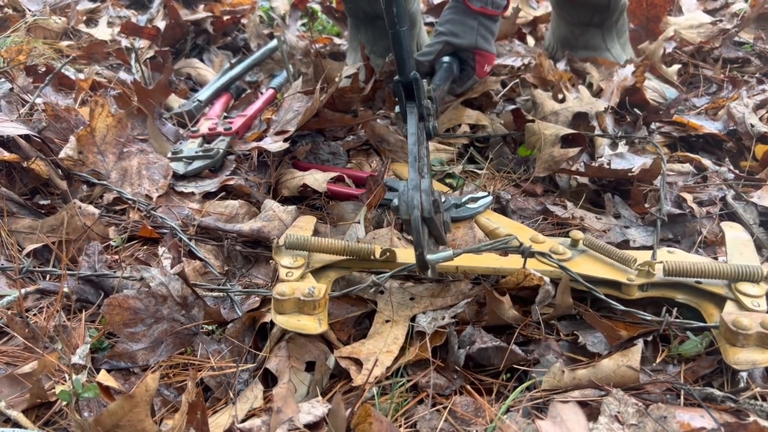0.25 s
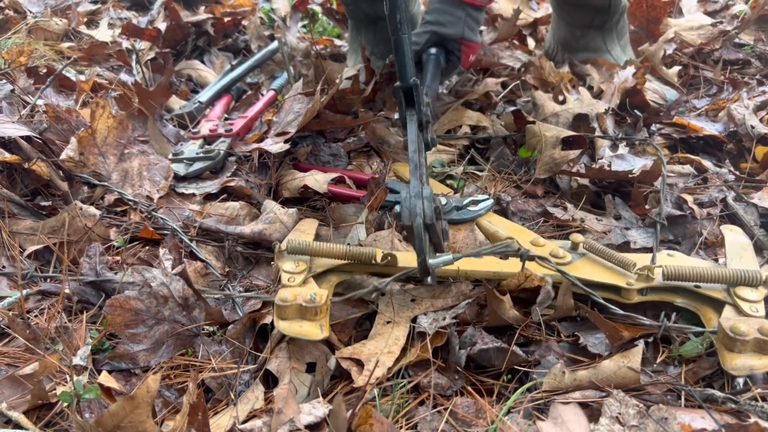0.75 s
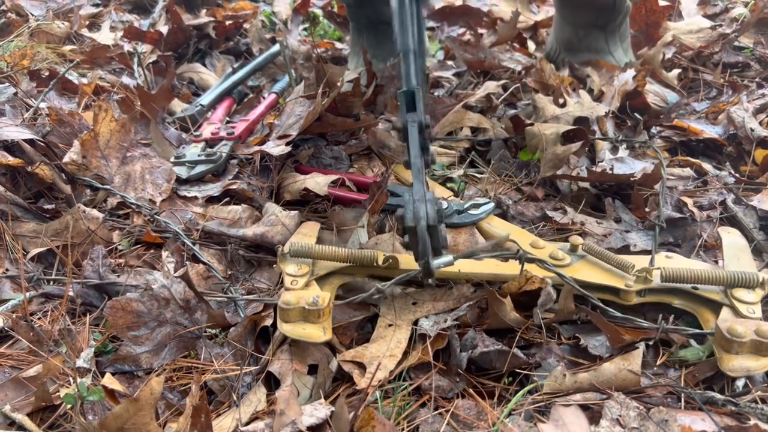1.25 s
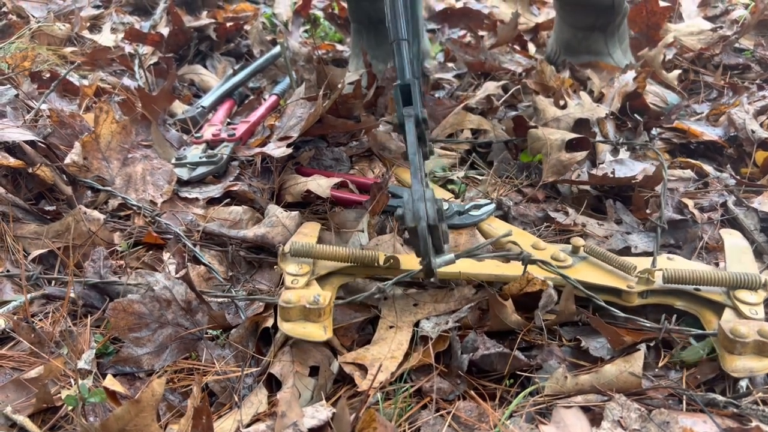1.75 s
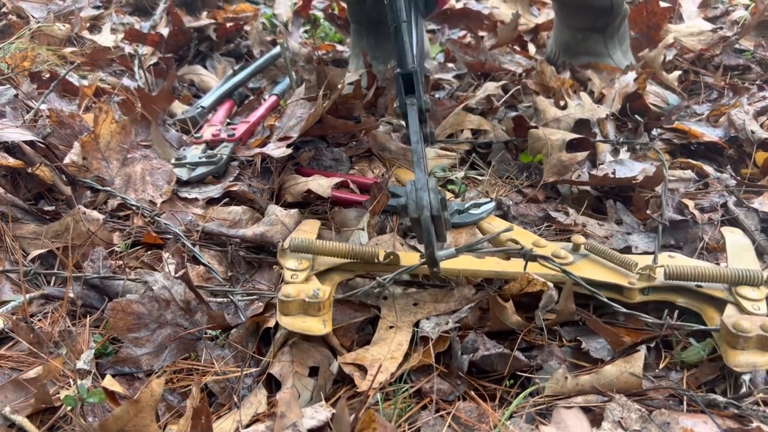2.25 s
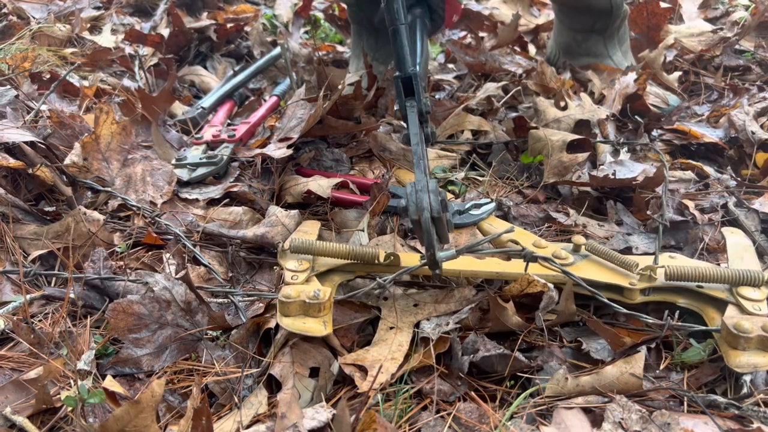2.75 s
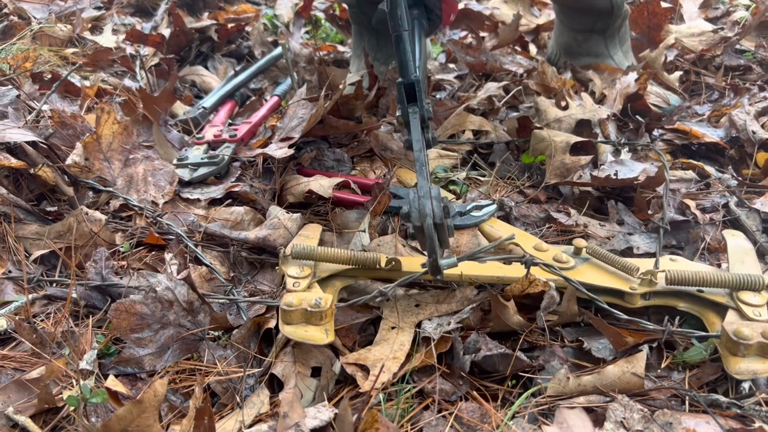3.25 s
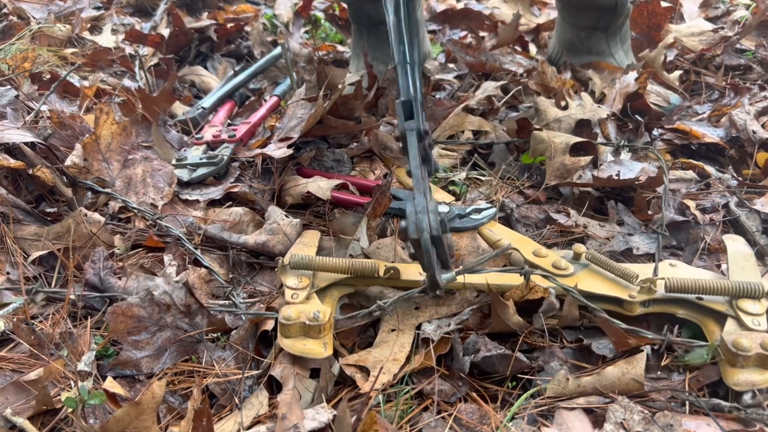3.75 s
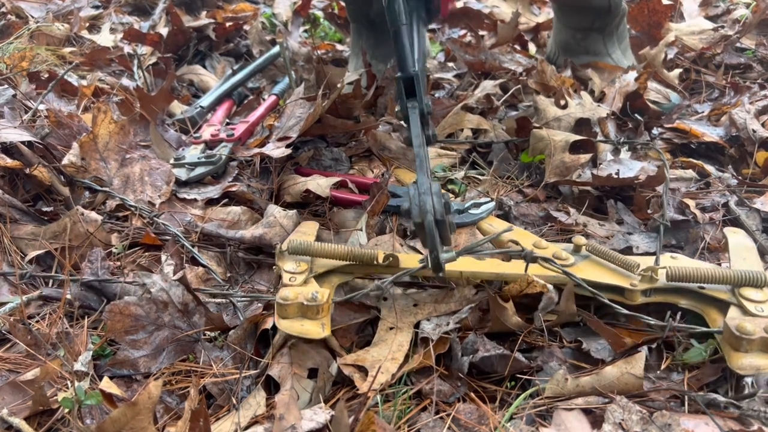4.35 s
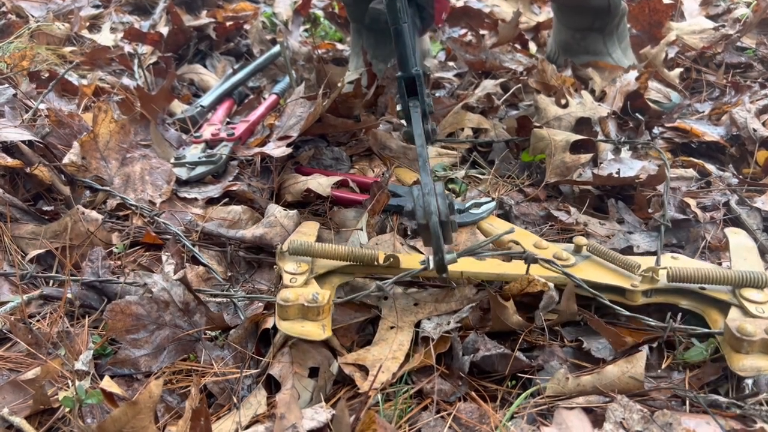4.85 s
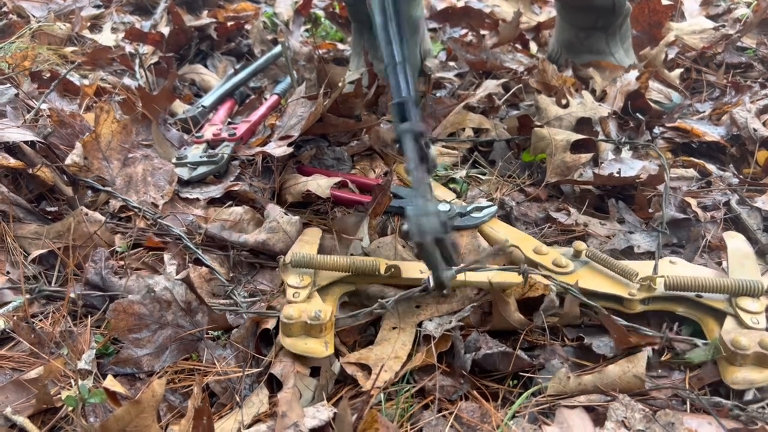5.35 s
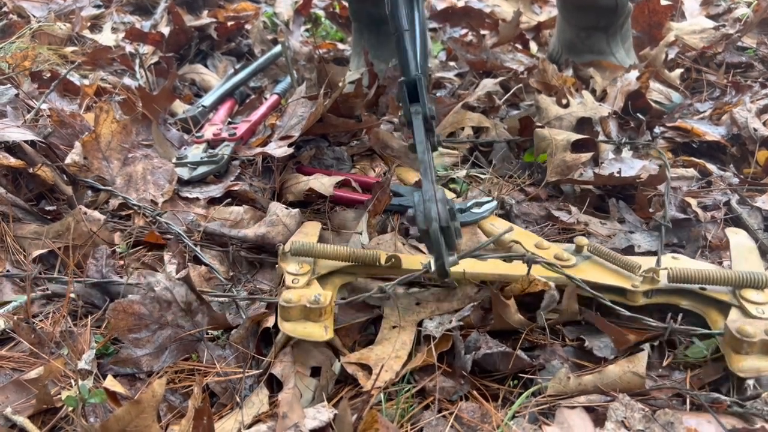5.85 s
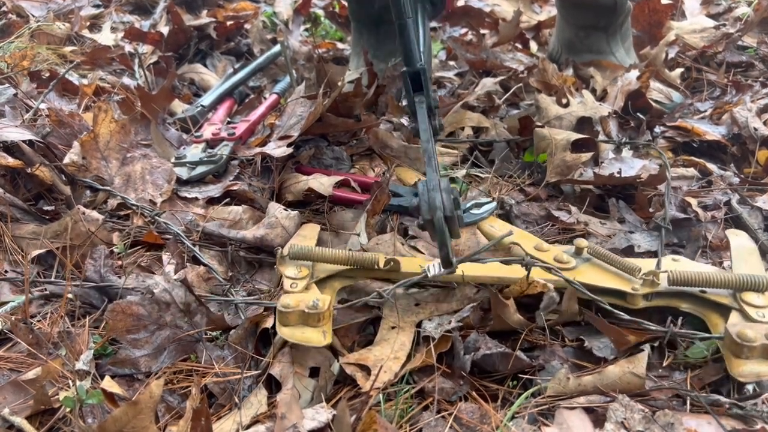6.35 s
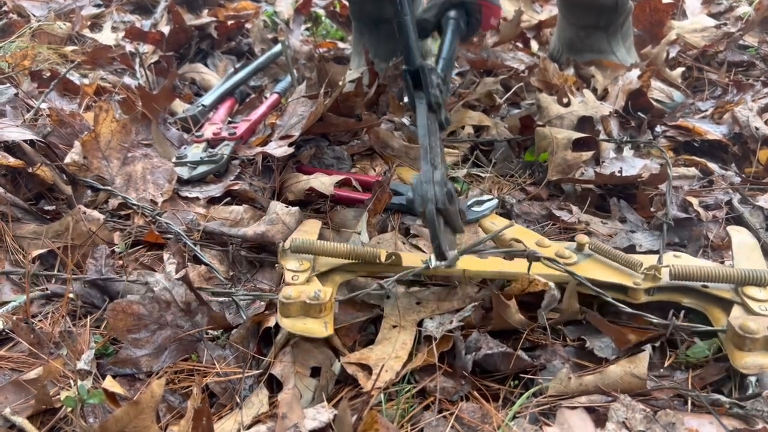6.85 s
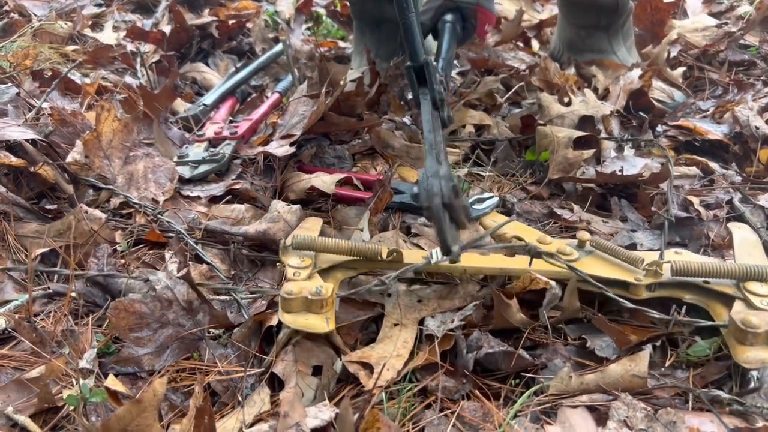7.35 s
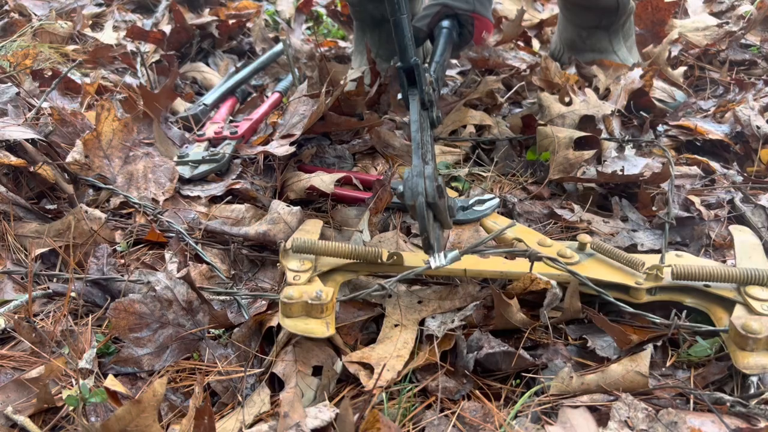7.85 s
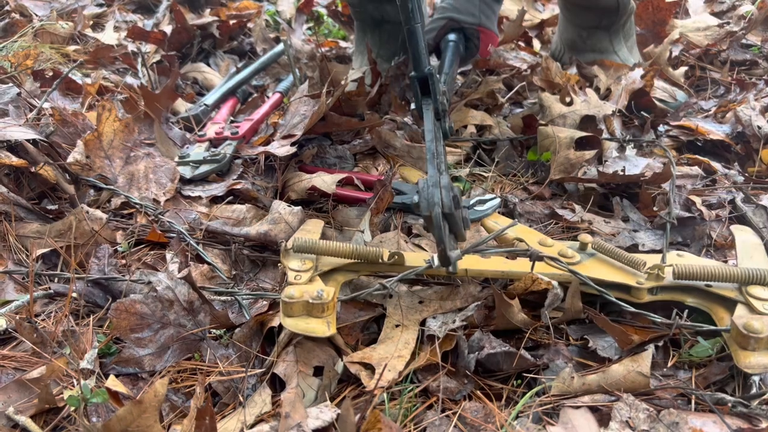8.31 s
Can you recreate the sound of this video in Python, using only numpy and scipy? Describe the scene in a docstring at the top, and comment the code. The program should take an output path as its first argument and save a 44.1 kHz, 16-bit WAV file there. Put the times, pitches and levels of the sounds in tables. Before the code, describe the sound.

Outdoors on leafy ground, a long-handled crimper works on wire. Three hard, very short steel clacks stand far above everything else, roughly two seconds apart. Between them come small metal ticks, brief scrapes, soft jacket and glove rustle and crackling leaves. After the last clack the jaws loosen with a busier run of ringing ticks and rattles. Close microphone, dry, with low wind rumble.

```python
"""Three loud steel clacks ring out as a long-handled crimping tool squeezes a sleeve on fence wire over dry leaves.
The clacks are sums of damped handle modes with a short noise crack. Between them the jaws tick, scrape and chatter:
gritty noise pushes one bank of steel resonances. Gloves and jacket rustle as coloured noise under a movement
curve, leaves crackle as short noise bursts round a pitch, and a light wind rumbles on the microphone as low noise."""
import sys
import numpy as np
from scipy import signal
from scipy.fft import rfft, irfft, next_fast_len
from scipy.io import wavfile
from scipy.ndimage import map_coordinates

SR = 44100
rng = np.random.default_rng(int(sys.argv[2]) if len(sys.argv) > 2 else 0)


def file_out(sig):
    """Save sig as 16-bit WAV at sys.argv[1]."""
    # one column per channel
    cols = np.atleast_2d(sig).T
    # limit, then scale
    lim = np.clip(cols, -1, 1)
    pcm = np.round(lim * 32767).astype(np.int16)
    wavfile.write(sys.argv[1], SR, pcm)


def amplitude_ratio(level_db):
    """Convert a level in decibels to the matching linear amplitude (field) ratio."""
    exponent = np.asarray(level_db, float) / 20
    return 10 ** exponent


N = 378378
TIME = np.arange(N) / SR

# the handles meet their stops: (time [s], level [dB])
CLACKS = [(1.2602, -4), (3.6229, -5.5), (5.3102, -4)]
# modes of the closed handles, before the grip damps them: (frequency [Hz], level [dB], t60 [s])
HANDLE_MODES = [(110, -30, .04), (978, -9.5, .042), (1400, -12, .008), (2335, -2, .036), (2700, -26, .008),
                (3000, -13, .012), (3500, -17, .01), (3800, -18, .014), (4130, -18, .016),
                (4750, -19, .018), (5300, -26, .015), (6500, -26, .015), (7300, -28, .015),
                (8300, -27, .018), (8850, -28, .018)]
GRIP_S = .0045  # gripping hands damp the handles: 1 dB lost by then, growing with the square of time

# jaws touch wire or sleeve: (time [s], level [dB], relative treble [dB], favoured pitch [Hz], slide t60 [s])
CONTACTS = [(0.6384, -43, -11, 2780, 0.12), (1.2131, -28.5, -14.5, 5000, 0.099),
            (1.3167, -33, -29, 3700, 0.049), (1.8506, -44, -11.5, 1230, 0.065),
            (1.8821, -36, -8, 4770, 0.013), (1.9872, -49, -1.5, 3600, 0.06),
            (2.0874, -42, -30, 4630, 0.085), (2.149, -44, -9, 4800, 0.24), (2.9214, -42.5, -30, 4700, 0.18),
            (2.953, -38.5, -20, 4790, 0.16), (3.6846, -34, -25.5, 3650, 0.05),
            (4.0634, -40.5, -3, 1610, 0.033), (4.1132, -23, -3, 5200, 0.035),
            (4.289, -39.5, -13, 5100, 0.24), (5.7945, -39, -9.5, 4800, 0.11), (6.07, -46, -1.5, 4730, 0.18),
            (6.1755, -49, -19.5, 4800, 0.088), (6.728, -32, -5.5, 4040, 0.08),
            (6.8583, -38.5, 1.5, 1560, 0.14), (7.2893, -37.5, -1, 3600, 0.11), (7.3675, -35, -7, 3730, 0.2),
            (7.396, -34, -9, 4270, 0.24), (7.4992, -30, -11, 3320, 0.026), (7.548, -49, -3, 4900, .06),
            (7.6708, -42.5, -14, 4180, 0.066), (7.7147, -41.5, -8.5, 4100, 0.15),
            (7.7987, -47, -12, 4150, .05), (7.9034, -45.5, 4, 4830, 0.027), (7.9478, -45.5, -7, 4790, 0.26),
            (8.091, -41, -7.5, 4060, 0.12), (8.3203, -40.5, -9, 3540, 0.07)]
OVERTONE = 2.27  # a touch also favours the treble this many times above its pitch
# the dull knock under a touch, relative to it at a pitch of 4800 Hz; deeper touches knock harder
KNOCK_DB, KNOCK_DB_PER_OCTAVE = -10.5, -8
# a loose part chatters: (start [s], gap [s], level [dB], loss per tick [dB], negative where the ticks grow)
CHATTER = [(6.79, .03, -50.5, -3), (7.31, .028, -46, 1), (7.686, .028, -54.5, -1),
           (7.851, 0.026, -55.5, -1), (7.926, .021, -49, 1), (7.988, .021, -48, 2.5)]
CHATTER_TICKS = 3  # in each run
CHATTER_TREBLE_DB, CHATTER_HZ, CHATTER_SLIDE_S = -1, 4900, 0.047
CHATTER_PING_HZ, CHATTER_PING_DB, CHATTER_PING_T60_S = 11400, -2, 0.041  # the loose part's own note
# steel drags over steel: (start [s], length [s], level [dB], relative treble [dB], swell from start to end [dB])
DRAGS = [(1.859, 0.022, -50.5, -3, -5), (1.922, 0.066, -64, -18, 4), (2.089, 0.029, -48, -9.5, -5),
         (2.149, 0.09, -56, -7.5, 11), (2.923, 0.068, -48, -6.5, 0.5), (4.06, 0.027, -48.5, -1, -4),
         (4.107, 0.011, -44, -1, -3), (4.285, 0.039, -41.5, 0, -7.5), (5.943, 0.012, -56, -10, -2),
         (6.074, 0.059, -40.5, -3, -11), (6.162, 0.023, -52.5, -8.5, 6.5), (6.728, 0.032, -51, -0.5, 7),
         (6.755, 0.088, -50, 1, -13), (6.854, .03, -49, -7, -4), (7.284, 0.087, -43.5, -5, -7),
         (7.369, 0.11, -41, 3, -13), (7.487, 0.058, -43.5, -16, -8), (7.66, 0.067, -59.5, -9, 8.5),
         (7.788, 0.0069, -50.5, -12, -3.5), (7.845, 0.024, -52, -3, 3.5), (7.902, 0.11, -50.5, -2, -4.5)]
BITE_S, LIFT_DB_PER_S = 0.01, 388  # how fast a drag catches and lets go
# broad resonances of jaws and wire: (frequency [Hz], width [Hz], relative level [dB])
STEEL_MODES = [(1576, 190, -12.5), (2183, 210, -6.5), (2720, 51, -7), (3030, 83, -7), (3290, 140, -10.5),
               (3820, 180, -9), (4150, 42, -7), (4800, 86, -3), (5110, 62, -16.5), (5480, 190, -14.5),
               (5670, 73, -27), (6000, 55, -19.5), (6400, 56, -12), (6900, 270, -7.5), (8300, 75, -16),
               (7900, 100, -10), (9600, 270, -17.5), (8520, 83, -13), (10186, 140, -8.5), (10600, 59, -20),
               (11330, 130, -8), (12200, 130, -13.5), (13700, 330, -22.5), (14400, 42, -28.5),
               (14220, 82, -20.5), (15400, 74, -33)]
# thin modes of taut wire and handles that outlast a touch:
# (frequency [Hz], relative level [dB], t60 [s], limited to 0.6 s)
WIRE_MODES = [(1510, -11, 0.69), (2360, -12.5, .3), (2670, -13, 0.63), (3020, -6.5, 0.4), (3420, -12.5, .4),
              (3620, -8.5, 0.56), (3730, -10.5, .45), (4050, -11, 0.38), (4900, -12, .55),
              (4770, -7.5, 0.19)]
LOOSE_FROM_S, LOOSE_RING_DB = 7.6, 4  # once the jaws hang loose the thin modes sing on louder

# arms and feet shift: (peak time [s], rise [s], fall [s], rustle level [dB]); rise and fall each span 13.93 dB
MOVES = [(.45, 0.024, 0.41, -71), (.63, 0.073, 0.14, -63), (0.731, .07, 0.092, -52.5),
         (.95, 0.098, 0.079, -63), (1.109, 0.052, 0.1, -55), (1.33, 0.3, 0.15, -60),
         (1.45, 0.11, 0.18, -57.5), (1.57, .04, 0.42, -64), (3.1, 0.18, 0.39, -69),
         (3.329, 0.087, 0.09, -58), (3.439, 0.045, 0.29, -57.5), (3.62, 0.064, 0.24, -57.5),
         (3.82, 0.053, 0.74, -65.5), (4.201, 0.56, .08, -66), (4.45, 0.11, 0.21, -72),
         (4.67, .12, 0.021, -71), (4.752, 0.029, 0.015, -66), (5.066, 0.11, 0.033, -53),
         (5.22, 0.2, 0.04, -53.5), (5.38, 0.11, 0.24, -50.5), (5.6, 0.17, 0.1, -60.5),
         (5.871, 0.29, .2, -67.5), (5.979, 0.063, 0.021, -63), (6.25, 0.39, 0.22, -60.5),
         (6.52, 0.19, .08, -59.5), (6.599, 0.12, 0.036, -61), (6.72, 0.13, 0.42, -61.5),
         (7.27, 0.12, 1, -63.5), (7.64, .03, 0.18, -73.5), (8.15, .3, .15, -78)]
REST_DB = -76  # cloth is never quite still
# leaves snap: (time [s], level [dB], relative treble [dB], pitch [Hz])
SNAPS = [(0.74, -41.5, -21, 2500), (0.915, -50, -23, 810), (1.088, -50, 0, 821), (1.127, -38.5, -18, 716),
         (1.416, -44, 0.5, 977), (1.43, -35.5, -26, 3150), (1.554, -49.5, 6, 833), (1.668, -46, -11, 1000),
         (1.853, -44, -30, 620), (1.94, -48, -30, 800), (3.329, -44, -17, 1517), (3.373, -42.5, -27, 1600),
         (3.496, -41.5, -27, 1800), (3.536, -35, -31, 1740), (3.796, -45, -27, 1250), (3.88, -69, 9, 4080),
         (3.932, -51, -30, 3160), (3.992, -44, -25.5, 3020), (4.06, -36.5, -26, 1670),
         (4.066, -42, -30, 520), (4.15, -41, -30, 330), (4.516, -49, -15, 2520), (4.472, -62, 6, 5000),
         (4.747, -46.5, -20, 1236), (5.501, -43, -24, 3620), (5.722, -37, -32, 1400),
         (5.727, -40, -30, 560), (5.733, -36.5, -12, 843), (5.747, -43, -1, 3960), (5.954, -46, 1.5, 3000),
         (6.2, -48, -30, 320), (6.22, -39, -28, 707), (6.245, -46, -30, 400), (6.232, -37.5, -33, 1330),
         (6.445, -48, -7, 730), (6.511, -44.5, -24, 3490), (6.911, -48.5, 7.5, 4680),
         (7.052, -63, -11, 4400), (7.248, -53, -1, 732), (7.643, -52, -5, 1300)]
SNAP_T60_S = .015
CRACKLES_PER_S, CRACKLE_DB = 45, 17  # faint snaps; level of the strongest over the movement
# spectrum of rubbing cloth: (frequency [Hz], density [dB per Hz])
CLOTH_SPECTRUM = [(120, -37.5), (200, -3.5), (497, -0.5), (1450, -3.5), (1710, -5.5), (3420, -5.5),
                  (5010, -7), (6020, -16), (8980, -13.5), (15500, -27.5)]
TREBLE_DB, TREBLE_GROWS = -12.5, 0.13  # at a movement of -59.5 dB; brisker rubbing is brighter

# strength of the wind's buffeting: (time [s], level [dB])
WIND_LEVEL = [(0.0, -38), (0.57, -34), (0.95, -45), (1.0, -33), (3.08, -36.5), (3.3, -43.5), (3.63, -31.5),
              (4.11, -35.5), (5.35, -33.5), (5.73, -40.5), (6.19, -28.5), (6.31, -36.5), (8.51, -36),
              (8.58, -36)]
# spectrum of the pressure swings on the microphone: (frequency [Hz], density [dB per Hz])
BUFFET_SPECTRUM = [(1.2, -28.5), (2.0, 5.5), (19, 4.5), (35, -17), (60, -34.5), (78, -59.5), (130, -120)]
# spectrum of the low roar: (frequency [Hz], density [dB per Hz])
ROAR_SPECTRUM = [(32, -40), (55, 0), (87, 3.5), (129, -3), (156, -16.5), (300, -21), (390, -40.5),
                 (660, -120)]
# spectrum of the far hiss of the woods: (frequency [Hz], density [dB per Hz])
AIR_SPECTRUM = [(90, -27), (150, -2), (340, -13.5), (800, -15), (2000, -25.5), (5000, -32.5), (6000, -32),
                (10000, -32.5), (15000, -34), (16000, -38)]
ROAR_DB, AIR_DB = -66, -73


def unit(x):
    """Normalisation: scaled to rms 1."""
    return x / np.sqrt(np.mean(x ** 2) + 1e-20)


def curves(rows):
    """Linear interpolation: one value per sample for each column after the time."""
    s, *cols = np.transpose(rows)
    return [np.interp(TIME, s, c) for c in cols]


def wobble(rate):
    """Slow random modulation: a smooth curve through rate random knots a second."""
    return map_coordinates(rng.standard_normal(int(N * rate / SR) + 4), [TIME * rate])


def filtered(x, response):
    """Linear filtering: the spectrum of x times a complex response of frequency."""
    n = x.shape[-1]
    m = next_fast_len(n + 8192)
    return irfft(rfft(x, m) * response(np.fft.rfftfreq(m, 1 / SR)), m)[..., :n]


def noise(spectrum):
    """Spectral shaping: noise of rms 1 coloured by (frequency [Hz], density [dB per Hz]) points."""
    f, db = np.transpose(spectrum)
    return unit(filtered(rng.standard_normal(N), lambda hz: amplitude_ratio(np.interp(np.log(hz + 1), np.log(f + 1), db))))


def grit(size, spread_db):
    """Surface roughness: dense random grains of rms 1 whose sizes scatter widely."""
    return unit(rng.standard_normal(size) * amplitude_ratio(spread_db * rng.standard_normal(size)))


def band(x, low_hz, high_hz):
    """Causal band-pass filtering."""
    return signal.sosfilt(signal.butter(N=3, Wn=[low_hz, high_hz], btype="band", fs=SR, output="sos"), x)


def resonance(f, centre, width):
    """Damped oscillator: causal response with gain 1 at its centre."""
    return 1j * f * width / (centre ** 2 - f ** 2 + 1j * f * width)


def add(out, s, sound):
    """Superposition: mixes a sound in at time s."""
    part = out[round(s * SR):][:len(sound)]
    part += sound[:len(part)]


def clacks():
    """Impact excitation: a blow builds within a millisecond, rings the handle modes and sheds a short crack."""
    out, t = np.zeros(N), np.arange(SR // 6) / SR
    grip = amplitude_ratio(-(t / GRIP_S) ** 2)
    for s, db in CLACKS:
        ring = np.zeros(len(t))
        for k, (hz, mode_db, t60) in enumerate(HANDLE_MODES):
            swing = -(-1) ** k  # neighbouring modes swing in opposite directions
            scatter_db = (hz > 2500) * rng.normal(0, 0.67)  # the high ones differ from blow to blow
            ring += swing * amplitude_ratio(mode_db + scatter_db - 60 * t / t60) * np.sin(2 * np.pi * hz * t)
        add(out, s, amplitude_ratio(db + .4) * ring * grip * (1 - np.exp(-t / .0005)))
        decay = amplitude_ratio(-14 - 60 * t / 0.012) + amplitude_ratio(-33 - 60 * t / .12)
        crack = decay * (1 - np.exp(-t / 0.00019)) * rng.standard_normal(len(t))
        add(out, s - .0005, amplitude_ratio(db) * band(crack, low_hz=1030, high_hz=8000))
    return out


def steel_body(size):
    """Modal response of the steel to a push; where it is touched decides which resonances speak."""
    f = np.fft.rfftfreq(size, 1 / SR)
    # a mode's width follows from its decay time
    thin = [(hz, np.log(1000) / np.pi / np.clip(t60, .05, .6), db + 4) for hz, db, t60 in WIRE_MODES]
    rubbing = [(2400, 5300, -19.0), (9200, 11000, -24)]  # so wide that they are heard without ringing
    hz, width, db = np.transpose([*STEEL_MODES, *thin, *rubbing])
    modes = (-1) ** np.arange(len(hz))[:, None] * resonance(f, hz[:, None], width[:, None])
    treble = hz > 5700
    lasting = width < 35

    def rung(push, bright_push, favoured_hz, scatter_db, loose):
        """Mode selection: broad resonances near the favoured pitches speak louder; thin ones do not care."""
        near_db = sum(8 * np.exp(-(np.log(hz / favoured) / 0.22) ** 2) - 1.5 for favoured in favoured_hz)
        random_db = rng.normal(0, scatter_db, len(hz)) * np.where(lasting, .4, 1)
        gain = amplitude_ratio(db + near_db * ~lasting + LOOSE_RING_DB * loose * lasting + random_db)
        low = amplitude_ratio(14.5) * rfft(push, size) * ((gain * ~treble) @ modes)
        high = amplitude_ratio(19) * rfft(bright_push, size) * ((gain * treble) @ modes)
        return irfft(low + high, size)
    return rung


def contacts(touches, rung):
    """Impact then friction: each touch is a tick with a short gritty slide, over a dull knock."""
    out, t = np.zeros(N), np.arange(SR // 4) / SR
    for s, db, treble_db, hz, slide in touches:
        tick_and_slide = amplitude_ratio(-7.5 - 60 * t / 0.01) + amplitude_ratio(-3 - 60 * t / slide)
        onset = 1 - np.exp(-t / 0.0009)
        push = amplitude_ratio(db) * tick_and_slide * onset * grit(size=len(t), spread_db=3.5)
        bright = amplitude_ratio(treble_db - 60 * t / 0.17) * push  # the treble of a slide fades first
        add(out, s - .0005, rung(push, bright, (hz, OVERTONE * hz), scatter_db=3.5, loose=s > LOOSE_FROM_S))
        knock_db = db + KNOCK_DB + KNOCK_DB_PER_OCTAVE * np.log2(hz / 4800)
        knock = amplitude_ratio(knock_db - 60 * t / 0.038) * rng.standard_normal(len(t))
        add(out, s, band(knock, low_hz=400, high_hz=1340))
    return out


def chatter(rung):
    """Repeated impact: a loose part ticks in short even runs, each tick with the part's own thin, bright note."""
    ticks = [(s + k * gap, db - k * loss_db, CHATTER_TREBLE_DB, CHATTER_HZ, CHATTER_SLIDE_S)
             for s, gap, db, loss_db in CHATTER for k in range(CHATTER_TICKS)]
    out, t = contacts(ticks, rung), np.arange(SR // 4) / SR
    for s, db, *_ in ticks:
        ping_db = db + CHATTER_PING_DB + rng.normal(0, 2.2) - 60 * t / CHATTER_PING_T60_S
        add(out, s, amplitude_ratio(ping_db) * np.sin(2 * np.pi * CHATTER_PING_HZ * t))
    return out


def drags(rung):
    """Stick-slip friction: unsteady grit pushes the steel while the point of contact wanders."""
    out = np.zeros(N)
    slips = amplitude_ratio(-3.0 + 3.26 * wobble(110)) * grit(size=N, spread_db=4.5)
    hop = SR // 25  # a new colour fades in every 40 ms
    fade = signal.windows.hann(2 * hop, sym=False)
    for s, length, db, treble_db, swell_db in DRAGS:
        first = round(s * SR / hop) * hop - 2 * hop
        for start in range(first, first + 8 * hop, hop):
            piece = slice(start, start + 2 * hop)
            t = TIME[piece] - s
            lift_db = LIFT_DB_PER_S * np.maximum(t - length, 0)
            drag_db = db + swell_db * np.clip(t / length, 0, 1) - lift_db
            push = amplitude_ratio(drag_db) * np.clip(t / BITE_S, 0, 1) * fade * slips[piece]
            bright = amplitude_ratio(treble_db) * push
            add(out, start / SR, rung(push, bright, favoured_hz=[4800], scatter_db=3.0, loose=s > LOOSE_FROM_S))
    return out


def steel():
    """Shared resonator: touches, chatter and drags all ring the same steel."""
    rung = steel_body(size=24576)
    return contacts(CONTACTS, rung) + chatter(rung) + drags(rung)


def movement():
    """Power addition of overlapping swells: how strongly cloth and leaves are stirred, as a gain."""
    swells = (amplitude_ratio(db - 13.93 * np.maximum((s - TIME) / rise, (TIME - s) / fall)) ** 2
              for s, rise, fall, db in MOVES)
    return np.sqrt(amplitude_ratio(REST_DB) ** 2 + sum(swells)) * amplitude_ratio(1.5 * wobble(25))


def leaves(stir):
    """Brittle fracture: a snap is a short noise burst round one pitch; faint ones follow the movement at random."""
    out, t = np.zeros(N), np.arange(SR // 16) / SR
    when, size, shine, pitch = rng.random((round(CRACKLES_PER_S * N / SR), 4)).T
    stir_db = 20 * np.log10(stir[(when * N).astype(int)])
    crackle_db = stir_db + CRACKLE_DB - 16 * size ** .5
    crackles = zip(when * N / SR + .001, crackle_db, -8 - 25 * shine, 700 * 6 ** pitch)
    for s, db, treble_db, hz in [*SNAPS, *crackles]:
        burst = amplitude_ratio(db - 60 * t / SNAP_T60_S) * (1 - np.exp(-t / 0.0013)) * rng.standard_normal(len(t))
        body = filtered(burst, lambda f: amplitude_ratio(11.5) * resonance(f, hz, 0.85 * hz) ** 2)
        treble = amplitude_ratio(treble_db + 6.5) * band(burst, low_hz=6500, high_hz=12000)
        add(out, s - .0005, body + treble)
    return out


def rustle(stir):
    """Fibre friction: cloth rubs as a dense hiss with faint clumps of crackle; now and then a leaf edge ticks."""
    shine = amplitude_ratio(TREBLE_DB + 2.1 * wobble(20)) * (stir / amplitude_ratio(-59.5)) ** TREBLE_GROWS
    clumps = amplitude_ratio(1.2 * wobble(40) + 1.5 * wobble(150) + 2.2 * wobble(900))
    rub = unit(clumps * noise(CLOTH_SPECTRUM))
    dull = filtered(rub, lambda hz: 1 / np.sqrt(1 + (hz / 5500) ** 8))
    ticks = (rng.random(N) < 45 / SR) * amplitude_ratio(28.5 + 5.5 * rng.standard_normal(N))  # 45 a second on average
    ticks = filtered(ticks, lambda hz: resonance(hz, 7200, 5000) ** 2)
    return stir * (unit(dull) + shine * (unit(rub - dull) + ticks))


def wind():
    """Turbulent pressure: slow swings on the microphone, a low roar and the far hiss of the woods."""
    buffet_db, = curves(WIND_LEVEL)
    buffets = amplitude_ratio(buffet_db) * noise(BUFFET_SPECTRUM)
    roar = amplitude_ratio(ROAR_DB + 1.5 * wobble(2.5) + 0.56 * wobble(4.5)) * noise(ROAR_SPECTRUM)
    return buffets + roar + amplitude_ratio(AIR_DB) * noise(AIR_SPECTRUM)


def scene():
    """Superposition of all sources, as one microphone hears them."""
    stir = movement()
    return (clacks() + steel() + leaves(stir) + rustle(stir) + wind())[None]


def roll_off(x):
    """The treble ends steeply here."""
    return signal.sosfilt(signal.butter(12, 15990, fs=SR, output="sos"), x)


def record(dry):
    """Band limiting: the microphone path ends just under 16 kHz."""
    mix = filtered(dry, lambda hz: 1 / (1 + (hz / 15700) ** 80))
    return roll_off(mix)


dry = scene()
out = record(dry)
file_out(out)
```